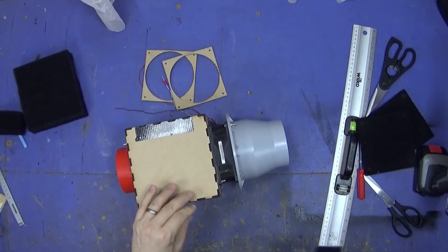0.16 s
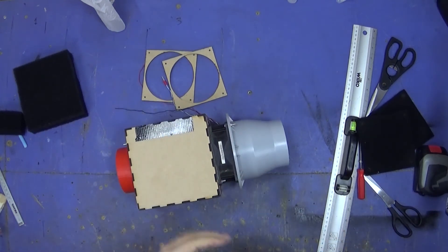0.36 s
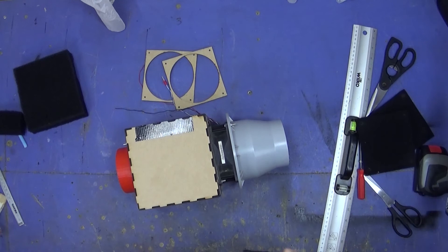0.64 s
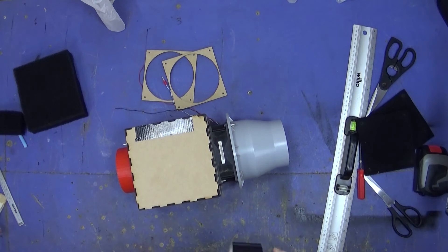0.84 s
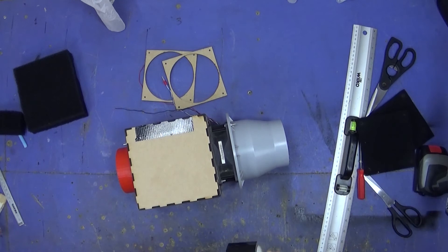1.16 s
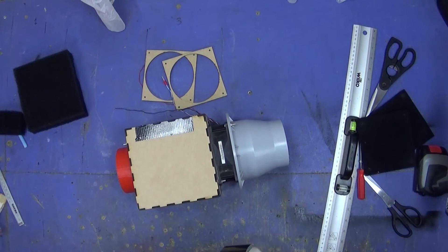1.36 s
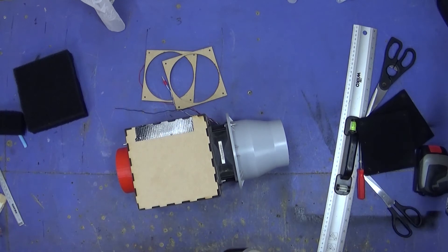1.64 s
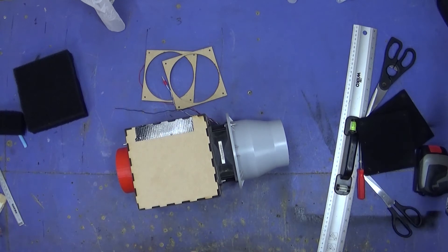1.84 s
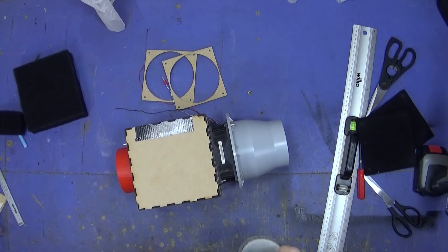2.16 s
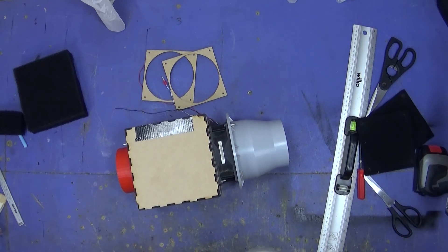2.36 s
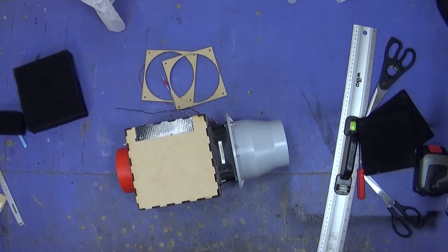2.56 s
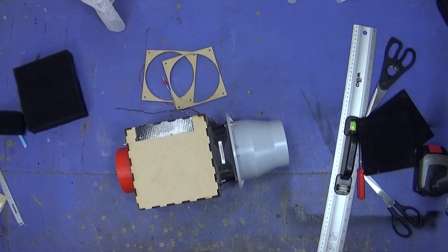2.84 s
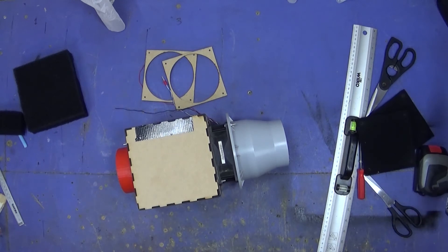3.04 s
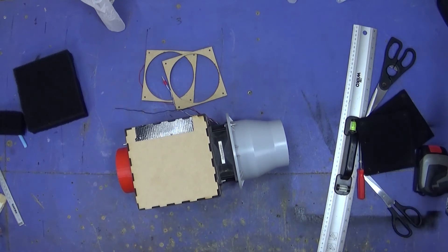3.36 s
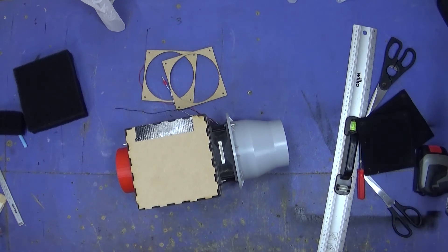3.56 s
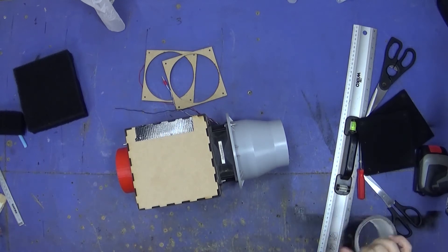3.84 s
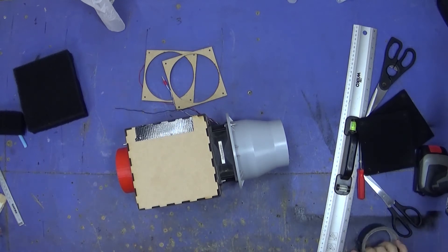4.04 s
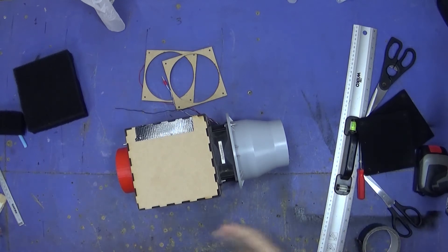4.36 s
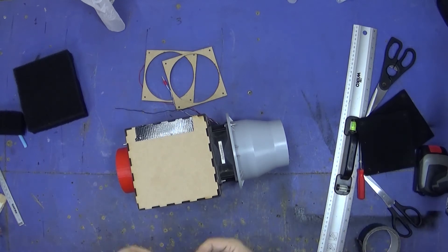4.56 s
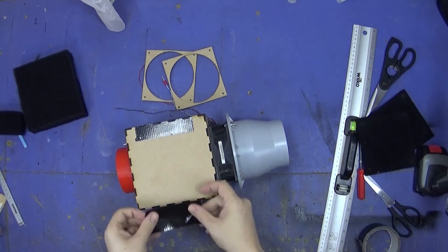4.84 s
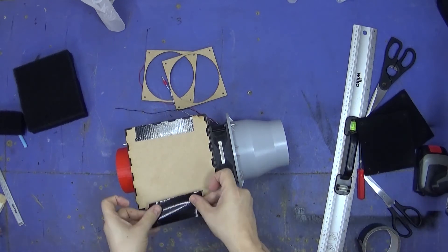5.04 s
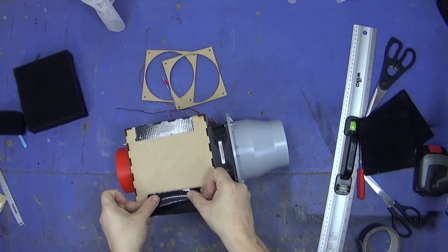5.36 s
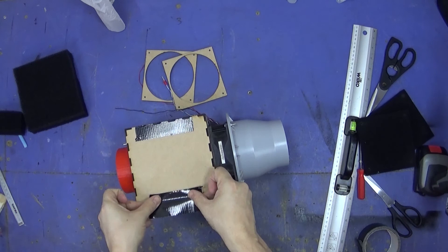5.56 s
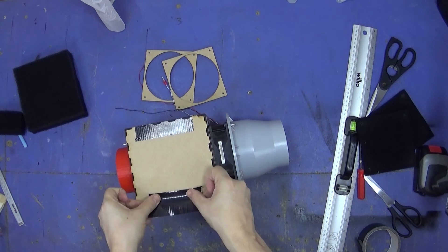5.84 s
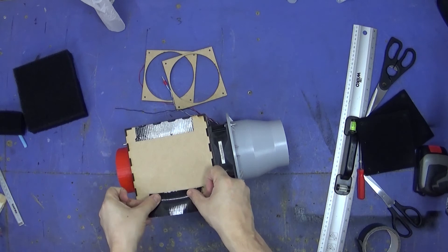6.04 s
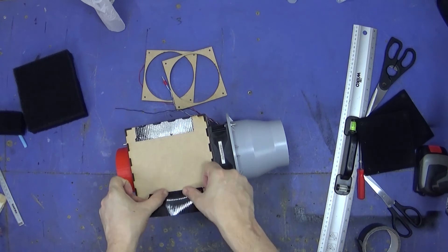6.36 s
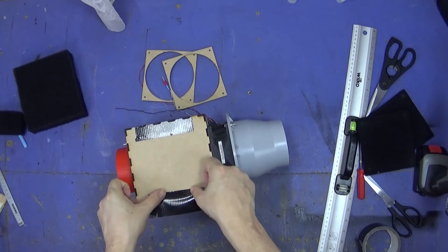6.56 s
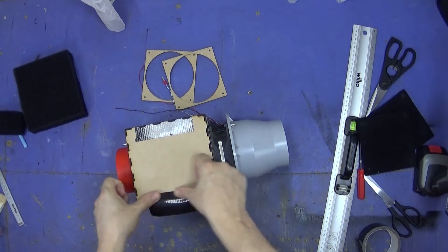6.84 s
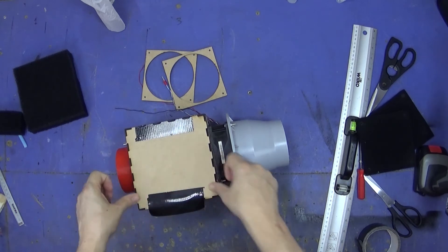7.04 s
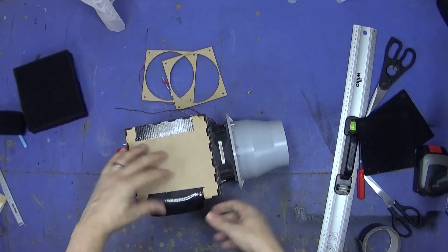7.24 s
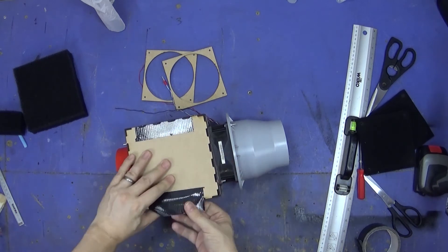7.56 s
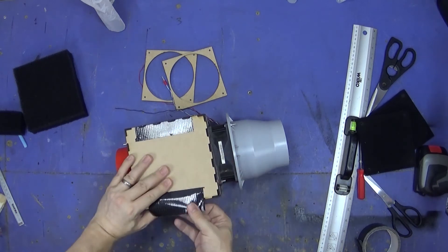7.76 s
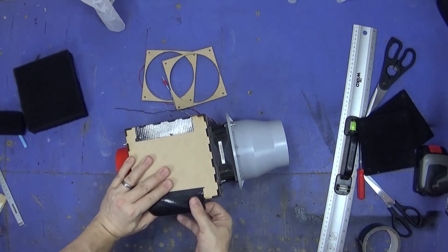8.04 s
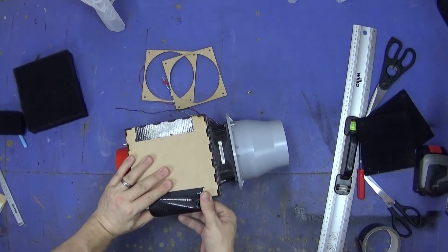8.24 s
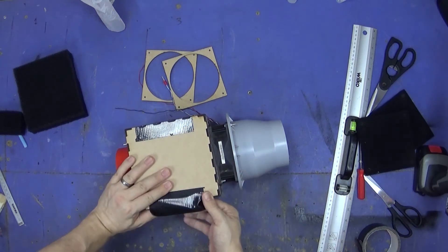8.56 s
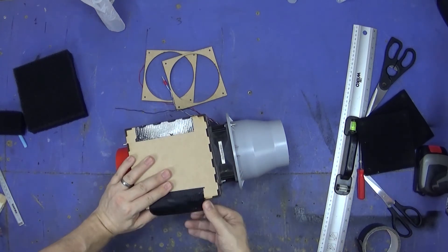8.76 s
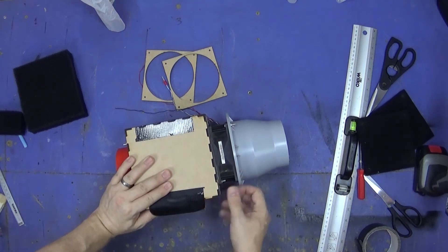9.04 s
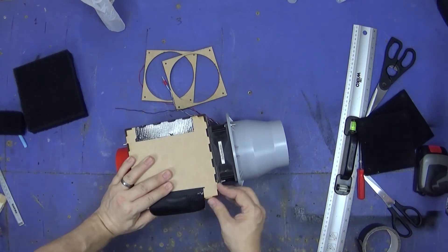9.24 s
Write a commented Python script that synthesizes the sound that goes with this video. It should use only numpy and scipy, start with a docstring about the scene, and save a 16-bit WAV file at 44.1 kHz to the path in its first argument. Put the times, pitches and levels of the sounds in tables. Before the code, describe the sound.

Close up at a workbench: a hand brushes a box, then tape comes off the roll in quick buzzing rips with small snaps between. A fingernail faintly scrapes the roll, one more rip follows, and the roll lands with a woody clap. The cut strip crackles softly as it is pressed onto the hollow box, with hissing rubs, low rumble, knocks and a loud final-part snap. Short, dense echo.

```python
"""Tape, box and bench

Sticky tape is pulled off its roll in short rips of fast clicks, and the film snaps in small crackles.
A fingernail scrapes round the roll, which then drops on a workbench with a clap, a ring and two bounces.
The strip crinkles, fingers rub with hiss and rumble, and a small wooden box knocks and rings.
A small workshop adds a short echo and faint, steady noise."""
import sys
import numpy as np
from scipy import signal
from scipy.fft import rfft, irfft, next_fast_len
from scipy.io import wavfile
from scipy.ndimage import uniform_filter1d

SR = 44100
rng = np.random.default_rng(int(sys.argv[2]) if len(sys.argv) > 2 else 0)


def materialize(psi):
    """Save the field psi as 16-bit PCM at rate SR to the path in sys.argv[1].

    A 1-D psi becomes a single channel; in a 2-D psi each row is a channel.
    """
    bounded = np.clip(np.atleast_2d(psi).T, -1, 1)
    quanta = np.round(bounded * 32767).astype(np.int16)
    wavfile.write(sys.argv[1], SR, quanta)


N = 414981  # length of the scene in samples


def undb(db):
    """Turn decibels into a gain."""
    return 10 ** (np.asarray(db) / 20)


def unit(x, seconds):
    """Scale a sound so that its energy equals that of rms 1 held for the given time."""
    return x / np.sqrt(np.sum(x ** 2) / (seconds * SR) + 1e-18)


def add(track, start, sound):
    """Mix a sound into a track at a time in seconds."""
    i = max(int(start * SR), 0)
    track[i:i + len(sound)] += sound[:max(len(track) - i, 0)]


def colour(x, points, tilt_db=0, peak_hz=1000, peak_db=0):
    """Filter through (Hz, dB) points, with a tilt per octave above 1200 Hz and one broad resonance."""
    n = next_fast_len(len(x), real=True)
    n += n % 2
    octave = np.log2(np.maximum(np.arange(n // 2 + 1) * SR / n, 1))
    hz, level = np.transpose(points)
    db = np.interp(octave, np.log2(hz), level)
    db = db + tilt_db * np.log2(np.maximum(2 ** octave / 1200, 1))
    db = db + peak_db * np.exp(-((octave - np.log2(peak_hz)) / 0.45) ** 2)
    # folding the cepstrum makes the filter answer only after the sound arrives
    cepstrum = irfft(np.log(undb(db)))
    cepstrum[1:n // 2] *= 2
    cepstrum[n // 2 + 1:] = 0
    response = np.exp(rfft(cepstrum))
    return irfft(rfft(x, n) * response, n)[:len(x)]


def fade(t, t60):
    """Die away smoothly, falling 60 dB in t60 seconds."""
    return np.exp(-np.log(1000) * t / max(t60, 1e-3))


def burst(t, t60):
    """Dying cluster of tiny cracks of uneven size."""
    return rng.laplace(size=len(t)) * fade(t, t60)


def ring(t, modes, soft_hz, scatter_db):
    """Struck wood rings at its own notes; uneven hits vary them and a soft contact weakens the high ones."""
    out = 0
    for k, (hz, db, t60) in enumerate(modes):
        softening = np.hypot(1, (hz / soft_hz) ** 3)
        size = undb(db + scatter_db * rng.standard_normal()) / softening
        sign = (-1) ** k
        out = out + sign * size * fade(t, t60) * np.sin(2 * np.pi * hz * t)
    return out


def walk(rate):
    """Random drift with a spread of 1, stepping about rate times a second."""
    k = int(SR / rate)
    steps = np.repeat(rng.standard_normal(N // k + 1), k)
    drift = uniform_filter1d(steps, k)[:N]
    return drift / drift.std()


def swell(fastest, rise, fall):
    """Speed of a hand movement that gathers pace and stops; all three settings in seconds."""
    t = np.arange(N) / SR - fastest
    return np.exp(-2 * np.abs(t / np.where(t < 0, rise, fall)) ** 1.5)


# strokes and crinkles die away in this share of the time they took to swell
FALL_SHARE = .33


def stereo(mid, side):
    """Left and right from a middle and a side signal."""
    return mid + side * np.array([[1], [-1]])


# colour of the room noise: (frequency [Hz], relative level [dB])
AIR_COLOUR = [(15, -39.5), (25, -8.5), (111, -12), (190, -14), (229, -10), (1230, -20.5), (1610, -21.5),
              (16000, -29.5)]
AIR_DB = -63.5


def air():
    """Faint, steady room noise and hiss, partly different on each side."""
    mid, side = (unit(colour(rng.standard_normal(N), AIR_COLOUR), N / SR) for _ in range(2))
    side = colour(side, [(300, -7), (3000, 1.0), (12000, -19)])
    return undb(AIR_DB) * stereo(mid, side)


# notes of the hollow box: (frequency [Hz], relative level [dB], time to fall 60 dB [s])
BOX_MODES = [(57.6, -13, 0.52), (142.3, -3.5, 0.27), (237, -2, 0.132), (278.9, -6.5, 0.22),
             (330.4, 4.5, 0.1), (352, 4.5, 0.17), (448, 0, 0.19), (523, 10.5, 0.043), (678, -7, 0.12),
             (822, -2, 0.14), (1167, 12, 0.06)]
# colour of rattling and rubbed wood: (frequency [Hz], relative level [dB])
WOOD_COLOUR = [(60, -15), (145, 1.5), (200, -11), (330, 4), (700, -11), (1300, -12.5), (2000, -14),
               (4000, -24)]


def knock(soft_hz, rattle_db=-6, rattle_t60=0.071, push_s=0.0015):
    """The hollow box rings with the knock of a soft finger, and its loose joints rattle."""
    t = np.arange(SR // 2) / SR
    panels = unit(ring(t, BOX_MODES, soft_hz, scatter_db=1), 0.035)
    rattle = colour(burst(t, rattle_t60), WOOD_COLOUR)
    rattle = signal.lfilter(*signal.butter(1, min(2 * soft_hz, SR / 4), fs=SR), rattle)
    push = 1 - np.exp(-t / push_s)
    return push * (panels + undb(rattle_db) * unit(rattle, 0.074))


# knocks and taps on the box: (time [s], level [dB], softness corner [Hz])
BOX_KNOCKS = [(.006, -42.5, 385), (.142, -47, 400), (1.481, -60.5, 350), (4.495, -60, 900),
              (5.518, -57, 640), (5.927, -57, 680), (6.505, -53.5, 1190), (6.616, -41.5, 260),
              (6.847, -40, 700), (7.084, -41.5, 485), (7.345, -53.5, 603), (7.463, -45, 724),
              (7.527, -46.5, 340), (7.848, -51.5, 300), (8.023, -50, 776), (8.583, -28, 720),
              (9.298, -50, 444)]
# a knock tips the box, which settles back with a dull bump
SETTLE_S, SETTLE_SOFT_HZ = .0142, 187
# knock level at which the bump is equally loud, and how fast its share grows with the knock
EVEN_BUMP_AT_DB, BUMP_DB_PER_DB = -31, 1


def knocks():
    """Each tap rings the box and rocks it on the bench; the harder the tap, the larger the bump's share."""
    out = np.zeros(N)
    for start, db, soft_hz in BOX_KNOCKS:
        bump_db = db + BUMP_DB_PER_DB * (db - EVEN_BUMP_AT_DB)
        add(out, start, undb(db) * knock(soft_hz))
        add(out, start + SETTLE_S, undb(bump_db) * knock(SETTLE_SOFT_HZ))
    return out


# finger strokes: (time when fastest [s], swell [s], hiss level [dB], rumble level in the wood [dB])
FINGER_STROKES = [(0.029, 1, -64, -54.5), (.83, 0.72, -63, -72), (2.526, .15, -57, -62.5),
                  (4.95, 0.27, -60.5, -83), (5.478, 0.18, -56, -60), (6.3, 0.21, -68, -59.5),
                  (7.065, 0.18, -50.5, -47), (7.355, 0.014, -60, -50), (7.617, 0.21, -52.5, -48.5),
                  (7.801, 0.057, -59, -55), (8.15, 0.053, -61, -76), (8.26, 0.018, -50, -61),
                  (8.84, 0.33, -57.5, -75), (9.129, 0.0083, -50, -82), (9.378, 0.21, -56, -62)]
# colour of skin or creases on the film: (frequency [Hz], relative level [dB])
FILM_HISS = [(1500, -9), (3500, -2.5), (6000, -3.5), (9200, 3), (12000, -6.5), (16000, -21.5)]
# from this time on, the hands also keep shifting on the box
HOLD_FROM_S, HOLD_HISS_DB, HOLD_WOOD_DB = 6.1, -71.5, -63.5


def rubbing(fidget_db=6.5, fidget_rate=12):
    """Skin catches on the tape in dense, uneven grains that hiss on the film and rumble in the wood."""
    hold_on = np.clip((np.arange(N) / SR - HOLD_FROM_S) * 10, 0, 1)
    holding = hold_on * undb(fidget_db * walk(fidget_rate))
    speed = undb(HOLD_HISS_DB) * holding
    pressure = undb(HOLD_WOOD_DB) * holding
    for fastest, rise, hiss_db, wood_db in FINGER_STROKES:
        stroke = swell(fastest, rise, FALL_SHARE * rise)
        speed += undb(hiss_db) * stroke
        pressure += undb(wood_db) * stroke
    unevenness_db = 3.2 * walk(rate=2000) + 1.3 * walk(rate=90)
    grains = rng.standard_normal(N) * undb(unevenness_db)
    hiss = unit(colour(grains, FILM_HISS), N / SR)
    rumble = unit(colour(grains, WOOD_COLOUR), N / SR)
    return speed * hiss + pressure * rumble


# flexes of the loose strip: (time when fastest [s], swell [s], level [dB])
STRIP_FLEXES = [(1.0, 0.4, -67.5), (4.6, 0.059, -62.5), (4.83, 0.059, -54.5), (4.965, 0.32, -50.5),
                (5.46, 0.18, -56), (7.58, 0.16, -66), (9.3, .08, -58)]


def crinkling(scatter_db=5, tilt_db=2):
    """Small creases pop one after another while the strip bends."""
    ticks_per_s, tick_t60 = 220, 0.009
    flex = sum(undb(db) * swell(fastest, rise, FALL_SHARE * rise) for fastest, rise, db in STRIP_FLEXES)
    pops = (rng.random(N) < ticks_per_s / SR) * undb(scatter_db * rng.standard_normal(N))
    tick_shape = fade(np.arange(SR // 20) / SR, tick_t60)
    ticks = signal.fftconvolve(pops, tick_shape)[:N] * rng.standard_normal(N)
    return flex * unit(colour(ticks, FILM_HISS, tilt_db), N / SR)


# tape snaps: (time [s], level before colouring [dB], body [dB], crispness [dB])
TAPE_SNAPS = [(1.7167, -44.5, -24, 8), (1.7366, -43, -10, 14.5), (1.7515, -44, -5, 14),
              (1.7863, -40.5, -10, 13.5), (2.422, -42.5, 7.5, -8), (2.5256, -26, -2, -1),
              (3.0769, -26, 6, 1.5), (3.462, -35.5, -1, 8), (3.49, -33, 4, -31), (3.5143, -52.5, 5, 21.5),
              (4.7307, -41, 2.5, -5), (5.0468, -34, 7, -5), (5.472, -41.5, 10.5, 11), (6.275, -24, 4, -8.5),
              (6.6108, -25, 3.5, 7.5), (7.526, -45, 20, 10.5), (7.6129, -34.5, 7.5, -3),
              (8.4021, -24, 5, -4), (8.5816, -13.5, 1.5, -4.5), (8.8875, -26.5, 5.5, 4)]
# a louder snap frees a larger patch of film, which rings lower
FILM_HZ, FILM_AT_DB, FILM_DB_PER_OCTAVE, SNAP_T60_S = 2183, -26.5, 16, .043


def snaps(film_db=5, creep_db=-18, creep_t60=0.033):
    """The stiff film creeps for a moment, then buckles or comes unstuck; what it is stuck to lends it body."""
    out, t = np.zeros(N), np.arange(SR // 8) / SR
    for start, db, low, high in TAPE_SNAPS:
        film_hz = FILM_HZ * 2 ** ((FILM_AT_DB - db) / FILM_DB_PER_OCTAVE)
        shape = [(80, low - 18), (350, low + 1), (900, low - 2), (2400, min(low / 2, 0)),
                 (4500, -0.17), (10000, high), (13500, high - 15)]
        creep = undb(creep_db) * burst(t, creep_t60)[::-1]  # reversed, so it grows
        crack = unit(np.concatenate([creep, burst(t, SNAP_T60_S)]), 0.005)
        snap = colour(crack, shape, peak_hz=film_hz, peak_db=film_db)
        add(out, start - len(t) / SR, undb(db) * snap)
    return out


# pulls on the tape: (time [s], length [s], level [dB], tilt [dB per octave],
# resonance of the free strip [Hz], gain of that resonance [dB])
TAPE_PULLS = [ (1.8303, .013, -22.5, 4.5, 9000, 5), (1.868, 0.0074, -16, 0, 3750, 6),
              (1.895, 0.0074, -17.5, -1, 3200, 5.5), (2.071, 0.035, -17.5, 0.5, 4300, 3),
              (2.126, 0.018, -18.5, -.5, 7470, 0), (2.641, .027, -17.5, -0.16, 3600, 6.5),
              (2.678, 0.089, -21.5, 0, 3500, -0.5), (3.584, 0.0062, -20.5, 5.5, 2400, 20),
              (3.602, 0.054, -19.5, 1, 3800, 8), ]
# colour of peeling tape: (frequency [Hz], relative level [dB])
PEEL_COLOUR = [(120, -38.5), (300, -3), (600, -7), (1300, -4.5), (2000, -1.5), (3500, 0.5), (5500, 2),
               (8300, 6), (10500, 1.5), (13000, -6), (16000, -17.5)]
# in every pull the slips slow down from the first rate towards the last
FIRST_SLIP_HZ, LAST_SLIP_HZ, SLOWING_S = 1191, 453.8, .03
# the ring of the short strip gives way to a thin sizzle as it lengthens
LENGTHEN_S, SIZZLE_HZ, SIZZLE_DB = 0.025, 8400, 4
# the roll's hollow core booms once, just before the longest rip
CORE_AT_S, CORE_HZ, CORE_DB, CORE_T60_S = 2.661, 314, -31.5, 0.076


def rips(jitter=.33, scatter_db=3, fibre_db=-2, fibre_t60=0.013, breakaway_db=4, creep_db=-33, creep_t60=0.16):
    """The glue sticks and slips in quick succession; each slip is a click and a fizz of breaking threads."""
    out, t = np.zeros(N), np.arange(SR // 8) / SR
    slip_rate = LAST_SLIP_HZ + (FIRST_SLIP_HZ - LAST_SLIP_HZ) * np.exp(-t / SLOWING_S)
    cycles = np.cumsum(slip_rate) / SR
    short = np.exp(-(t / LENGTHEN_S) ** 2)
    for start, length, db, tilt_db, strip_hz, strip_db in TAPE_PULLS:
        gap, size = rng.standard_normal((128, 2)).T
        turns = np.cumsum(np.exp(jitter * gap))  # uneven waits between slips
        when = np.interp(turns - turns[0], cycles, t)
        live = when < length
        slips = np.zeros(len(t))
        slips[(when[live] * SR).astype(int)] = undb(scatter_db * size[live])
        slips[0] = undb(breakaway_db)  # glue that has rested holds hardest
        threads = signal.fftconvolve(slips, fade(t, fibre_t60))[:len(t)] * rng.standard_normal(len(t))
        peel = unit(slips, length) + undb(fibre_db) * unit(threads, length)
        strip = colour(peel * short, PEEL_COLOUR, tilt_db, strip_hz, strip_db)
        sizzle = colour(peel * (1 - short), PEEL_COLOUR, tilt_db, SIZZLE_HZ, SIZZLE_DB)
        add(out, start, undb(db) * unit(strip + sizzle, length))
        creep = colour(burst(t, creep_t60)[::-1], PEEL_COLOUR)  # the glue creeps as the pull builds
        add(out, start - len(t) / SR, undb(db + creep_db) * unit(creep, 0.01))
    core = fade(t, CORE_T60_S) * np.sin(2 * np.pi * CORE_HZ * t)
    add(out, CORE_AT_S, undb(CORE_DB) * core)
    return out


# resonances of the roll: (frequency [Hz], half the bandwidth [Hz], relative level [dB])
ROLL_MODES = [(321.4, 19, -0.5), (1180, 51, -7), (2340, 180, -9.5), (5040, 48, -11.5), (7010, 51, -12.5)]
# a fingernail slides round the roll to find the tape's end
NAIL_AT_S, NAIL_SWELL_S, NAIL_FALL_S, NAIL_DB = 3.2, .12, .3, -57


def nail(grain_db=3, width=2.0):
    """A nail scrapes faintly along the roll and excites its narrow resonances."""
    grains = rng.standard_normal(N) * undb(grain_db * walk(rate=1100))
    scrape = np.zeros(N)
    for hz, half_width, db in ROLL_MODES:
        resonance = signal.iirpeak(hz, hz / (width * half_width), fs=SR)
        scrape += undb(db) * signal.lfilter(*resonance, grains)
    return undb(NAIL_DB) * swell(NAIL_AT_S, NAIL_SWELL_S, NAIL_FALL_S) * unit(scrape, N / SR)


# the roll lands and bounces: (time [s], level of the bench's ring [dB])
ROLL_LANDINGS = [(4.0334, -21), (4.0431, -30), (4.0738, -30.5)]
# notes of the bench top: (frequency [Hz], relative level [dB], time to fall 60 dB [s])
BENCH_MODES = [(142.4, -1.5, 0.39), (176.2, -10.5, 0.17), (222, -6.5, 0.33), (337, 7, 0.1), (357, -4, 0.19),
               (484, -2, 0.18), (547, 1, 0.055), (806, -7, 0.15), (970, -10, 0.1)]
# colour of the landing's clap: (frequency [Hz], relative level [dB])
CLAP_COLOUR = [(45, -8), (150, -4.5), (500, -1.5), (1100, -3.5), (1600, -13.5), (2300, -24), (4000, -31),
               (10000, -34.5), (16000, -57.5)]


def roll(thud_db=4, thud_t60=0.14, scuff_t60=0.032):
    """The heavy roll drops on the bench: a dull clap and a dense shudder over the modes of the top."""
    out, t = np.zeros(N), np.arange(SR // 2) / SR
    for start, db in ROLL_LANDINGS:
        top = unit(ring(t, BENCH_MODES, soft_hz=1800, scatter_db=2.0), 0.027)
        shudder = burst(t, thud_t60) + 2 * burst(t, scuff_t60)
        clap = unit(colour(shudder, CLAP_COLOUR), 0.019)
        add(out, start, undb(db) * (top + undb(thud_db) * clap))
    return out


def spread(x, side_db=-10, corner_hz=1400):
    """The broad bench top radiates the low notes, whose shifted phase makes left and right differ."""
    low = signal.sosfiltfilt(signal.butter(1, corner_hz, fs=SR, output="sos"), x)
    quarter_turn = signal.hilbert(low, next_fast_len(N))[:N].imag
    return stereo(x, undb(side_db) * quarter_turn)


# the workshop's echo: (frequency [Hz], level relative to the sound sent in [dB])
ECHO_COLOUR = [(80, -13.5), (180, -13.5), (330, -11), (600, -6), (1500, -8), (4000, -7), (8500, -9.5),
               (15000, -12)]


def workshop(x, low_t60=0.37, high_t60=0.3, build_s=0.0022):
    """Bench and walls return a short, dense echo whose treble dies first, a little different on each side."""
    t = np.arange(SR // 2) / SR
    tails = []
    for _ in range(2):
        noise = rng.standard_normal(len(t))
        low = signal.lfilter(*signal.butter(1, 3000, fs=SR), noise)
        decay = low * fade(t, low_t60) + (noise - low) * fade(t, high_t60)
        tail = decay * (1 - np.exp(-t / build_s))
        tails.append(colour(unit(tail, 1 / SR), ECHO_COLOUR))
    side = colour(tails[1], [(130, -15.5), (400, -11.5), (1500, -7.5), (9000, -9.0), (13000, -36.5)])
    return stereo(signal.fftconvolve(x, tails[0])[:N], signal.fftconvolve(x, side)[:N])


def scene(further_db=5.5, count=3):
    """The box lies under the microphone; the roll is pulled further off, so more of it comes from the room."""
    tape = rips()
    wood = knocks() + rubbing() + roll()
    handling = crinkling() + nail()
    # buckling film sends a different crackle towards each wall, which evens out the colour of its echo
    snap_echo = sum(workshop(snaps()) for _ in range(count)) / np.sqrt(count)
    direct = tape + handling + snaps() + spread(wood)
    echo = workshop(undb(further_db) * tape + wood + handling)
    return direct + echo + snap_echo + air()


def record(dry, low_cut_hz=48, top_hz=16000):
    """The recorder thins the deep bass, rounds the highest peaks and cuts the top."""
    thin = signal.sosfilt(signal.butter(3, low_cut_hz, "high", fs=SR, output="sos"), dry)
    rounded = .7 * np.tanh(thin / .7)
    return signal.sosfilt(signal.ellip(10, .2, 70, top_hz, fs=SR, output="sos"), rounded)


dry = scene()
out = record(dry)
materialize(out)
```